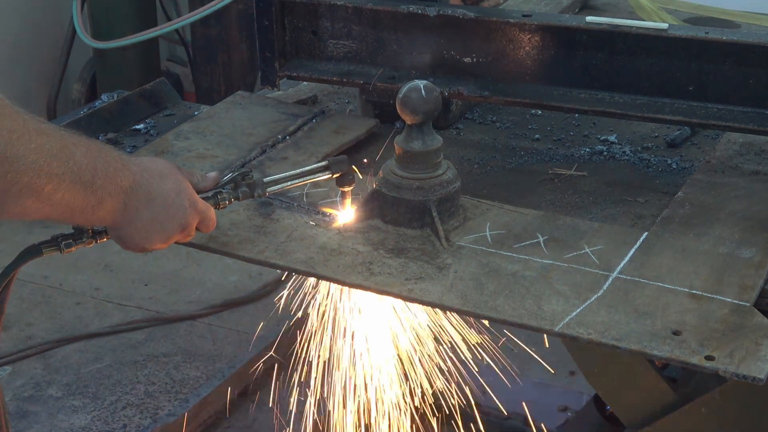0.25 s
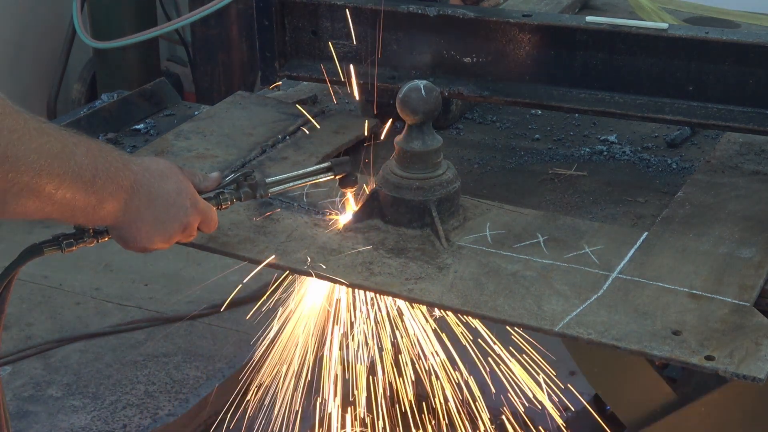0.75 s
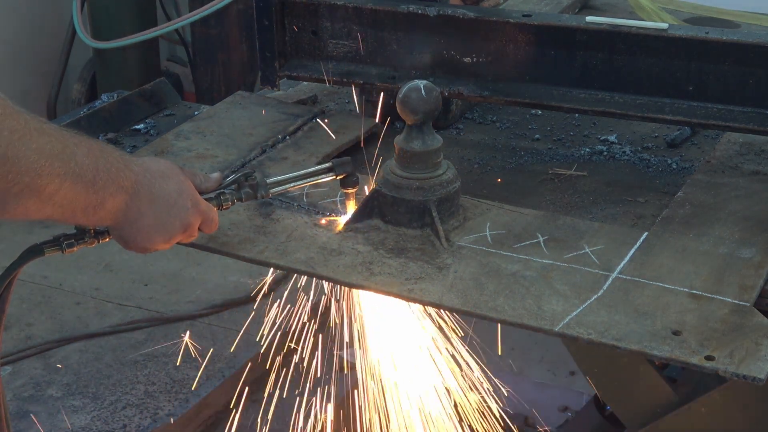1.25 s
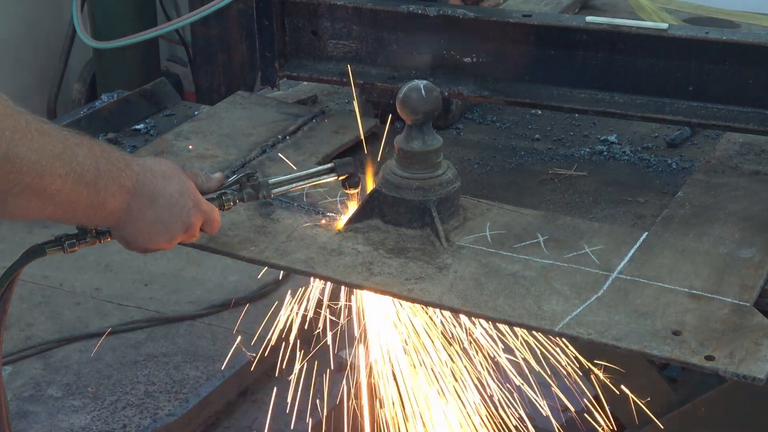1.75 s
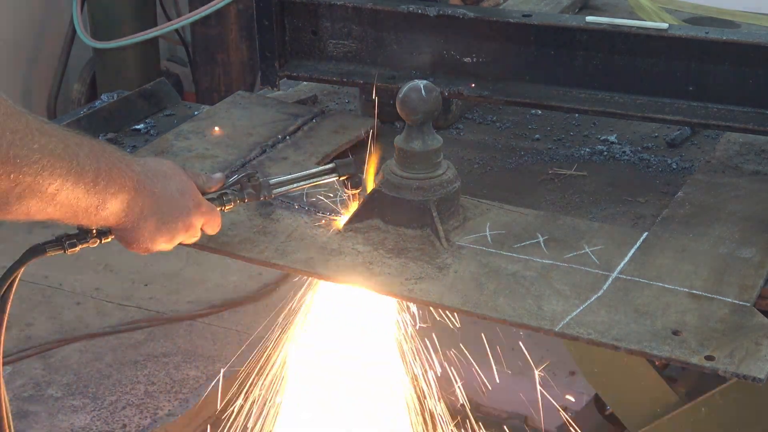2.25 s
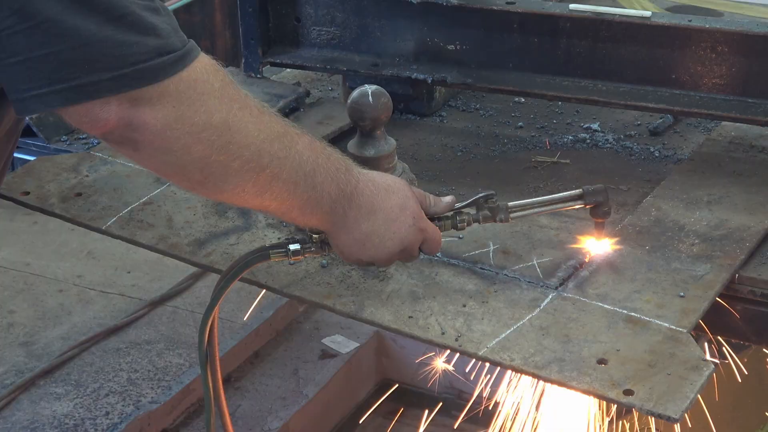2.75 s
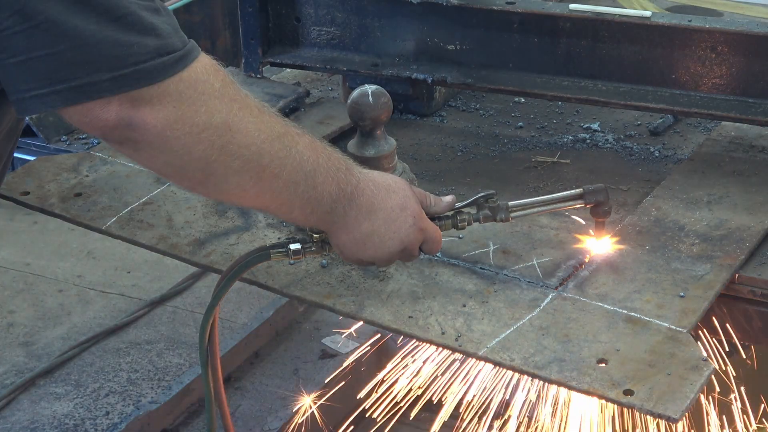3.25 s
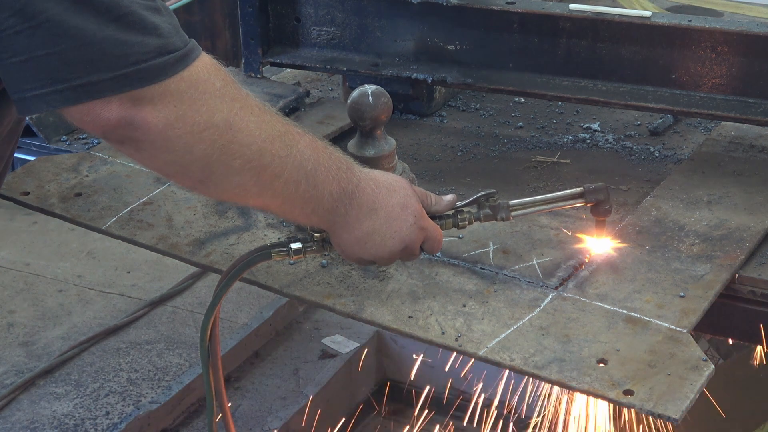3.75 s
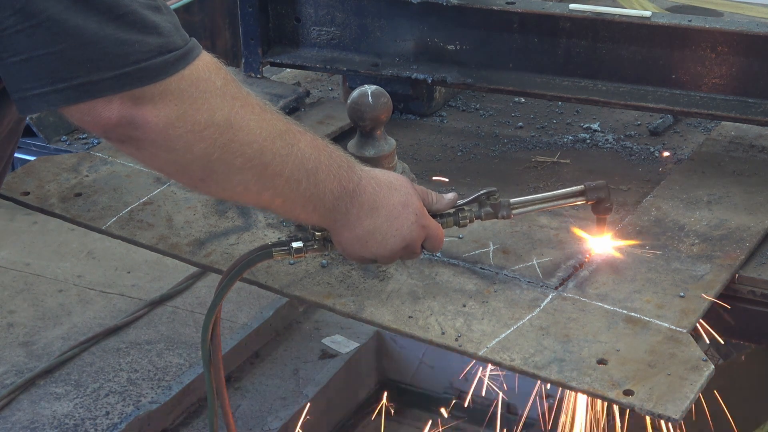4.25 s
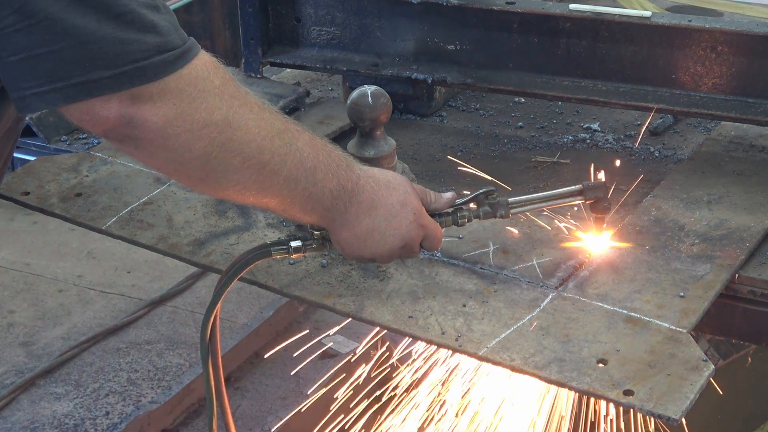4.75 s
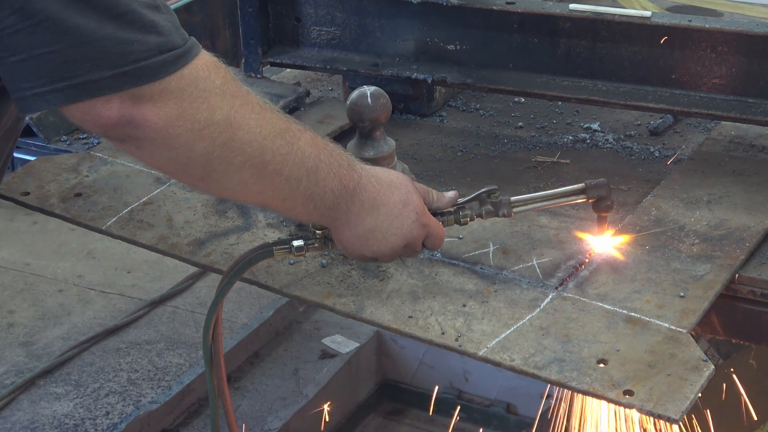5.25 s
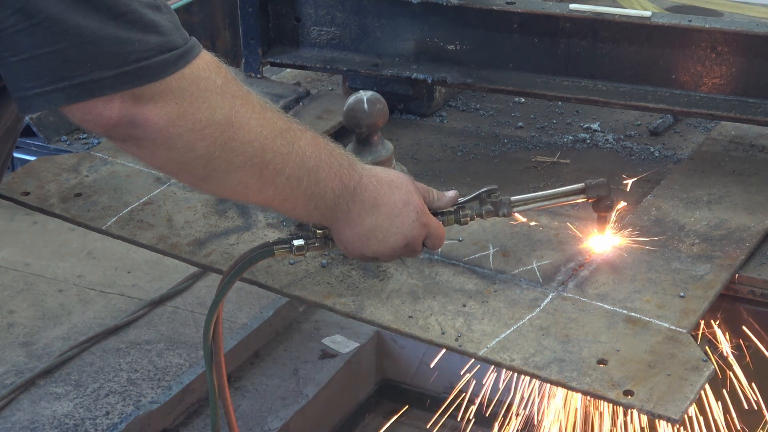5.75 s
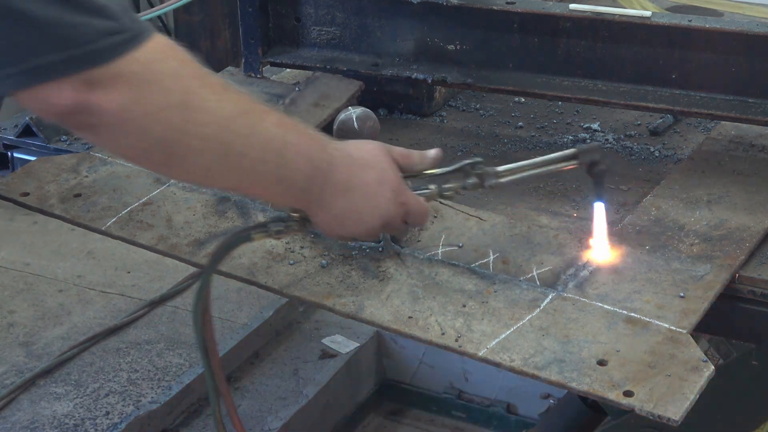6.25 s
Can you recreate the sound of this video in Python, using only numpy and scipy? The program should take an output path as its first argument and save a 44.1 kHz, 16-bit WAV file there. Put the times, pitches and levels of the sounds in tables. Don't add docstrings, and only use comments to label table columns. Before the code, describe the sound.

Close, dense torch hiss with gurgling slag chokes and spark sizzle in a workshop, jumping to a second cut before the oxygen jet shuts off.

```python
import sys
import numpy as np
from scipy import signal
from scipy.fft import rfft, irfft
from scipy.io import wavfile
from scipy.ndimage import uniform_filter1d

SR = 44100
rng = np.random.default_rng(int(sys.argv[2]) if len(sys.argv) > 2 else 0)


def volts(x):
    e = np.asarray(x, float) / 20
    return 10 ** e


def put_to_file(sound):
    columns = np.atleast_2d(sound).T
    safe = np.clip(columns, -1, 1)
    whole_steps = np.round(safe * 32767)
    wavfile.write(sys.argv[1], SR, whole_steps.astype(np.int16))


N = 285768
T_S = np.arange(N) / SR
HZ = np.maximum(np.fft.rfftfreq(N, 1 / SR), 1)
SECOND_CUT_S = 2.7815
LIFT_S, LIFT_TAKES_S = 5.86, 0.15


def rms_one(x):
    return x / np.sqrt(np.mean(x ** 2) + 1e-20)


def at_hz(points, hz):
    points = np.array([p for p in points if p[0] > 0])
    return np.interp(np.log(hz), np.log(points[:, 0]), points[:, 1])


def drift(rate_hz):
    pole = np.exp(-128 * np.pi * rate_hz / SR)
    coarse = rng.standard_normal(N // 64 + 1002)
    slow = signal.lfilter([1], [1, -2 * pole, pole * pole], coarse)[1000:]
    return np.interp(np.arange(N) / 64, np.arange(len(slow)), rms_one(slow))


def swells(rows):
    t = np.arange(0, N, 32) / SR
    total_db = sum(db * np.exp(-((t - s) / length) ** 2) for s, length, db in rows)
    return np.interp(T_S, t, total_db)


PART_EDGES_HZ = [300, 1300, 3600, 8000, 15700]
# f/Hz, density/dB per Hz
FIRST_COLOUR = [(120, -49), (250, -22.5), (330, -17.5), (450, -7.5), (900, -6), (1500, -7.5), (2500, -7.5),
                (4500, -6), (6500, -7), (7500, -11.5), (10000, -19.5), (12500, -22), (15700, -21.5)]
SECOND_COLOUR = [(120, -50), (250, -21), (330, -15), (480, -2), (900, -1), (1500, -2), (2500, -1),
                 (4500, -1), (6400, -2.5), (7300, -8.5), (10000, -16.5), (12500, -20.5), (15700, -20)]
FLAME_COLOUR = [(120, -48), (250, -23), (400, -8.5), (700, -2.5), (1300, -4.5), (2100, -7), (3000, -10),
                (5000, -10.5), (7500, -16), (9000, -26), (12000, -30), (15700, -36)]
# f/Hz, width/Hz, lift/dB
FIRST_SLOT = [(620, 40, 2.5), (900, 200, 2), (1080, 50, 2), (1360, 70, 2.5), (1990, 120, 3),
              (2210, 90, 4.5), (2700, 80, 4), (2970, 100, 2), (3310, 40, 6), (4040, 150, 3),
              (4250, 60, 2.5), (4520, 120, 2.5), (5140, 150, 3), (5730, 200, 3), (6300, 200, 3)]
SECOND_SLOT = [(236, 20, 6), (410, 40, 3), (695, 30, 3), (950, 80, -3), (1035, 30, 3), (1530, 45, 4),
               (1940, 55, 4), (2290, 120, 2.5), (2500, 60, 1.5), (2600, 70, 3), (3150, 70, 3),
               (3290, 60, 2), (3900, 40, 4), (4130, 70, 3), (4310, 60, 3), (4720, 60, 2), (4920, 90, 5.5),
               (5200, 150, -2.5), (6100, 150, 4)]
FLAME_SLOT = [(410, 39, 1.6), (675, 80, 2.3), (1800, 61, 2.7)]


def torch(own_db, near_db, surge_db):
    lift_lean_db = 1
    levels = part_levels()
    lifted = np.clip((T_S - LIFT_S) / LIFT_TAKES_S, 0, 1)
    shares = [T_S < SECOND_CUT_S, (T_S >= SECOND_CUT_S) * np.sqrt(1 - lifted), np.sqrt(lifted)]
    stages = [stage(FIRST_COLOUR, FIRST_SLOT), stage(SECOND_COLOUR, SECOND_SLOT),
              stage(FLAME_COLOUR, FLAME_SLOT)]
    middles = np.log(np.sqrt(np.multiply(PART_EDGES_HZ[1:], PART_EDGES_HZ[:-1])))
    centres = np.linspace(np.log(150), np.log(14000), num=14)
    out = np.zeros((2, N))
    surge, before = drift(25.0), drift(5.0)
    for k, centre in enumerate(centres):
        window = np.interp(np.log(HZ), centres, np.arange(centres.size) == k)
        mix = np.array([np.interp(centre, middles, row) for row in np.eye(4)])
        after = drift(5.0)
        flicker_db = own_db * drift(4.0) + near_db * (before + after) + surge_db * surge
        before = after
        for (pair, own_parts_db), share, parts_db in zip(stages, shares, levels):
            on = share > 0
            gain_db = mix @ parts_db[:, on] - mix @ own_parts_db + flicker_db[on]
            out[:, on] += share[on] * volts(gain_db) * irfft(pair * window, N)[:, on]
    return out * volts(lift_lean_db / 2 * lifted * [[1], [-1]])


# roar/dB, rush/dB, hiss/dB, sizzle/dB
STEADY = [
    (-35, -29.5, -27, -35),
    (-34, -27.5, -27, -33.5),
    (-31.5, -32.5, -38, -46.5),
]
# roar, rush, hiss, sizzle, all dB/dB
FOLLOWS_JET = (0.17, 0.13, 1., 0.58)
FOLLOWS_SLAG = (0.87, 0.62, -0.13, -0.16)
FOLLOWS_STUMBLE = (0.61, 0.75, 0.54, 0.23)
FOLLOWS_SHOWER = (0., 0.3, 0, 0.79)
# t/s, oxygen jet/dB, slag load/dB
FIRST_JET = [
    (0.0, -30, 4),
    (0.01, -28.5, 1),
    (0.36, -29, -0.5),
    (0.43, -25.5, 0),
    (1.22, -28, -0.5),
    (2.15, -26, -0.5),
    (2.55, -30.5, 0.5),
    (2.77, -26, 1.5),
]
SECOND_JET = [
    (2.79, -25.5, 0),
    (4.51, -26, 0),
    (4.64, -30, 0),
    (4.81, -26, 0),
    (5.52, -27, 0),
    (6.01, -31, 0.0067),
    (6.04, -34, 0),
]
LET_GO_JET = [
    (6.07, -39, -1),
    (6.2, -40.5, 0),
    (6.48, -40, 0.5),
]
# t/s, length/s, level/dB
STUMBLES = [(.65, 0.027, -3), (1.08, 0.069, -1), (2.225, .015, -5), (2.6, .06, -2.5), (2.765, .012, -2.5),
            (2.815, 0.029, 1), (4.47, .05, -1.5), (3.09, 0.067, -2.5), (3.51, 0.067, -4.5), (3.85, .06, -2),
            (4.14, 0.022, -2), (4.64, 0.1, -2), (5.62, .03, 0), (5.875, 0.039, -5), (6.14, .04, -0.5)]
# t/s, length/s, level/dB
CHOKES = [(.22, .05, 0.5), (.79, 0.13, 4.5), (2.03, .08, 2), (2.31, 0.086, 6.5), (2.85, 0.1, 1),
          (3.38, 0.054, 1), (4.07, 0.12, 1.5), (4.85, 0.11, 2), (5.3, 0.15, 3), (5.8, 0.093, 3),
          (6.05, 0.029, 2.5), (6.26, .04, 0.5)]
# t/s, length/s, level/dB
SHOWERS = [(.08, .1, 2), (.46, .07, 0), (.77, 0.066, 4.5), (1.48, 0.17, 3.5), (2.09, .06, 4.5),
           (2.55, .1, 1.5), (4.48, 0.081, 3.5), (.92, 0.11, 1), (5.02, 0.11, 3.5), (5.48, .06, 3.5),
           (5.84, 0.069, 4), (5.99, .05, 2.5)]


def part_levels():
    sizzle_fade_db_per_s = -2.1
    s, jet_db, slag_db = np.transpose(FIRST_JET + SECOND_JET + LET_GO_JET)
    jet_db = np.interp(T_S, s, jet_db)
    slag_db = np.interp(T_S, s, slag_db) + swells(CHOKES)
    moves = np.outer(FOLLOWS_SLAG, slag_db)
    moves += np.outer(FOLLOWS_STUMBLE, swells(STUMBLES))
    moves += np.outer(FOLLOWS_SHOWER, swells(SHOWERS))
    levels = []
    for steady in STEADY:
        jet_moves = np.outer(FOLLOWS_JET, jet_db - steady[2])
        levels.append(np.array(steady)[:, None] + jet_moves + moves)
    levels[1][-1] += sizzle_fade_db_per_s * (T_S - SECOND_CUT_S)
    return levels


def stage(colour, slot):
    pair = port_pair()
    lift_db = sum(db / (1 + (2 * (HZ - hz) / width) ** 2) for hz, width, db in slot)
    centre = np.sqrt(uniform_filter1d(np.abs(pair.mean(axis=0)) ** 2, size=4000))
    pair = pair / centre * volts(at_hz(colour, HZ) + lift_db) * shop_echoes()
    power = 2 * np.abs(pair.mean(axis=0) / N) ** 2
    parts = [power[(HZ > lo) & (HZ < hi)].sum() for lo, hi in zip(PART_EDGES_HZ, PART_EDGES_HZ[1:])]
    return pair, 10 * np.log10(parts)


# f/Hz, likeness 0-1
LIKENESS = [(60, 0.1), (130, 0.26), (300, 0.81), (1000, 0.68), (2200, 0.7), (3500, 0.47), (4800, 0.47),
            (6000, 0), (7200, 0.2), (11000, 0.34), (15000, .34)]
# f/Hz, lead/rad
LEAD = [(60, 0.), (2500, -.15), (4300, .35), (5300, .3), (6300, 2.5), (7200, 3.7), (11000, 4.),
        (13000, 3.5), (15500, 4.1)]
# f/Hz, level/dB
LEAN = [(100, -1), (300, 2), (1200, 1.5), (2400, 2.), (4400, 2), (5600, -2.5), (6800, -2), (8500, 1.5),
        (11000, 3), (15000, 5)]


def port_pair():
    shared, other = rfft(rng.standard_normal((2, N)))
    alike = np.clip(at_hz(LIKENESS, HZ), 0, .99)
    led = np.exp(1j * at_hz(LEAD, HZ)) * shared
    right = alike * led + np.sqrt(1 - alike ** 2) * other
    lean = volts(at_hz(LEAN, HZ) / 2)
    return np.array([shared * lean, right / lean])


def shop_echoes():
    t60_s, level_db = .4, -12.
    n = np.arange(int(t60_s * SR))
    hits = rng.standard_normal(n.size) * (rng.random(n.size) < .03)
    tail = hits * volts(-60 * n / SR / t60_s)
    tail *= volts(level_db) / np.sqrt(np.sum(tail ** 2))
    return 1 + rfft(tail, N)


# peak t/s, fall/s, f/Hz, width/Hz, level/dB
HOWLS = [(0.718, 0.12, 980, 200, -40), (.86, .08, 1083, 250, -39), (0.502, .11, 4480, 120, -39),
         (.57, 0.053, 330, 120, -47), (2.265, .05, 925, 170, -24), (2.33, .04, 990, 200, -31),
         (2.46, .03, 980, 200, -33), (2.33, .06, 2150, 400, -31), (2.95, .25, 4740, 150, -36),
         (3.9, .45, 4920, 150, -35), (5.1, .5, 4900, 160, -38), (4.82, .05, 2300, 200, -30),
         (5.3, .35, 2350, 400, -31), (5.93, .05, 400, 60, -38), (5.99, .12, 232, 40, -48),
         (6.02, .018, 430, 130, -26.5), (6.085, .045, 410, 70, -31), (6.17, .025, 400, 80, -37),
         (6.02, 0.015, 594, 400, -30), (6.07, 0.041, 653, 370, -32), (6.24, .07, 610, 300, -38.5)]


def howls():
    out, white = np.zeros((2, N)), irfft(port_pair(), N)
    for s, fall, hz, width, db in HOWLS:
        rise = 0.5 * fall
        on = slice(max(int((s - 3 * rise) * SR), 0), min(int((s + 3 * fall) * SR), N))
        late = np.arange(on.start, on.stop) / SR - s
        slot = signal.butter(2, [hz - width / 2, hz + width / 2], "band", fs=SR, output="sos")
        tone = rms_one(signal.sosfilt(slot, white[:, on]))
        tone /= np.sqrt(.2 + uniform_filter1d(tone.mean(axis=0) ** 2, size=900))
        swell = np.exp(-(late / np.where(late < 0, rise, fall)) ** 2)
        out[:, on] += volts(db) * tone * swell
    return out


# t/s, length/s, level/dB
SINGING = [(2.83, .1, 1), (3.02, .06, -1), (3.27, .08, 3.5), (3.65, 0.064, 6.5), (4.07, 0.049, 5),
           (4.45, 0.17, 1), (4.82, 0.044, 6), (5.01, .04, 5.5), (5.4, 0.19, 3.5), (5.58, .04, 5),
           (5.76, .07, 1)]


def whistle():
    centre_hz, width_hz, level_db, dies_s = 2580, 260, -34.5, .06
    slot = 1 / (1 + (2 * (HZ - centre_hz) / width_hz) ** 2)
    cutting = (T_S > SECOND_CUT_S) * np.clip(1 - (T_S - LIFT_S) / dies_s, 0, 1)
    sung_db = level_db + swells(SINGING) + 1.3 * drift(15.0)
    return cutting * volts(sung_db) * rms_one(irfft(port_pair() * slot, N))


def wind():
    wind_db, wind_db_per_s, hum_db, hum_db_per_s = -69, -1.1, -68.5, -0.9
    low = signal.butter(2, [15, 70], "band", fs=SR, output="sos")
    dull = signal.butter(2, [100, 220], "band", fs=SR, output="sos")
    gust_level_db = wind_db + wind_db_per_s * T_S + 2.2 * drift(2.5) + [[-.7], [.7]]
    hum_level_db = hum_db + hum_db_per_s * T_S + 2.0 * drift(3.3) + [[.8], [-.8]]
    gust = rms_one(signal.sosfilt(low, rng.standard_normal((2, N))))
    hum_noise = rng.standard_normal(N) + 1.1 * rng.standard_normal((2, N))
    hum = rms_one(signal.sosfilt(dull, hum_noise))
    return volts(gust_level_db) * gust + volts(hum_level_db) * hum


def scene():
    return torch(own_db=0.7, near_db=0.33, surge_db=-0.07) + howls() + whistle() + wind()


def band_limit(x):
    return signal.sosfilt(signal.butter(12, 16750, fs=SR, output="sos"), x)


def record(dry):
    dip_s, cutoff_hz = 0.0018, 15730
    away_s = np.abs(T_S - SECOND_CUT_S)
    dipped = dry * np.clip(away_s / dip_s, .15, 1)
    mix = irfft(rfft(dipped) * (HZ < cutoff_hz), N)
    return band_limit(mix)


dry = scene()
out = record(dry)
put_to_file(out)
```